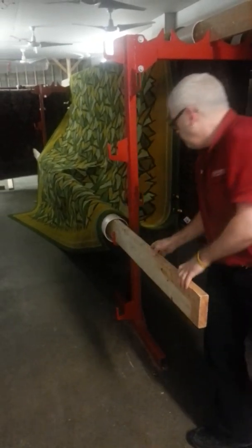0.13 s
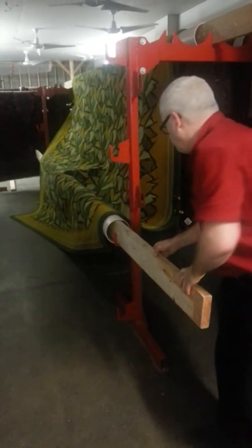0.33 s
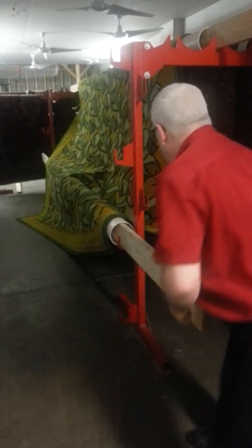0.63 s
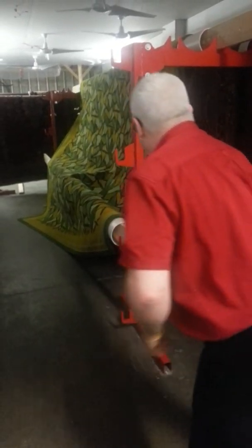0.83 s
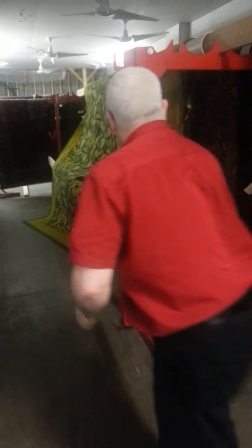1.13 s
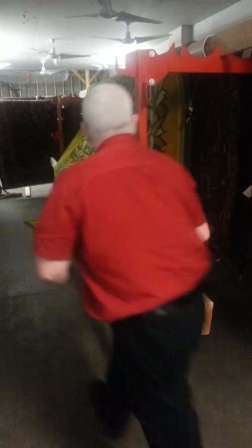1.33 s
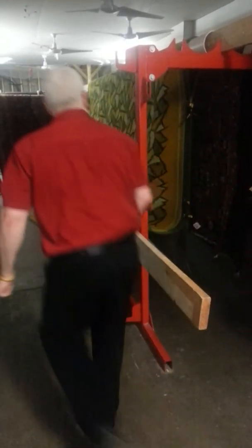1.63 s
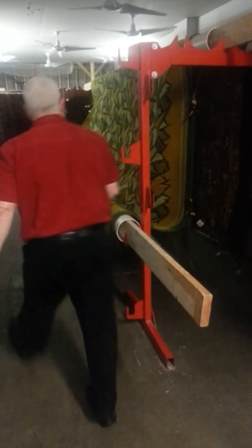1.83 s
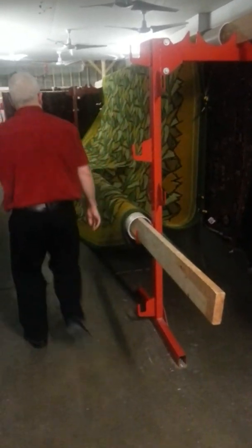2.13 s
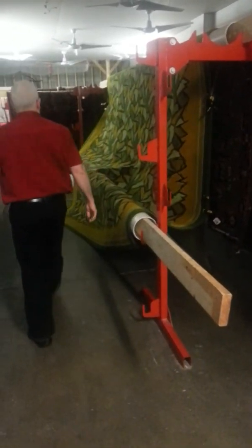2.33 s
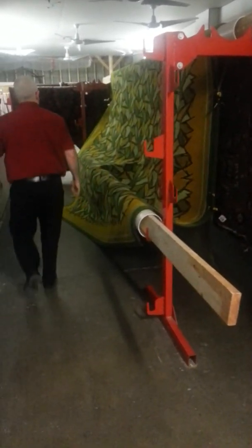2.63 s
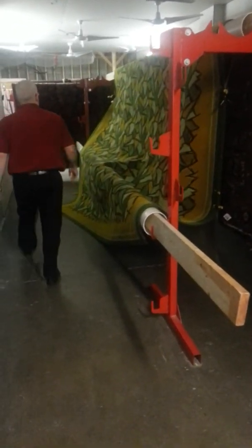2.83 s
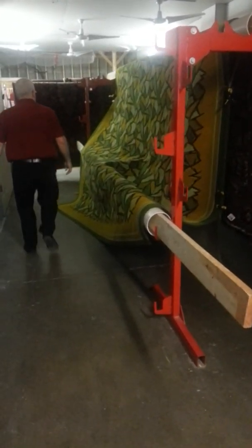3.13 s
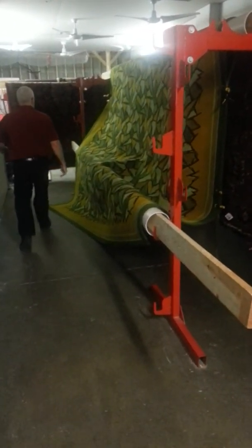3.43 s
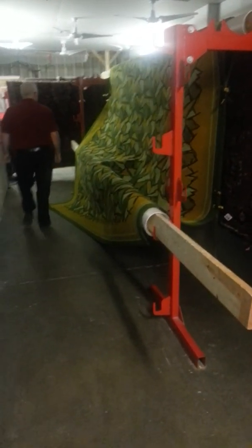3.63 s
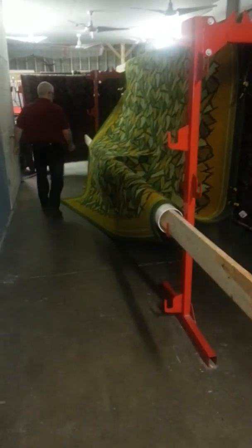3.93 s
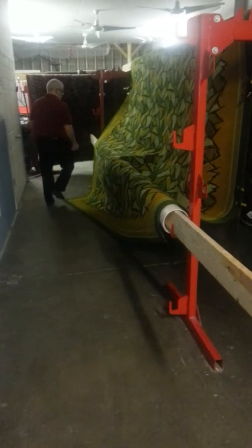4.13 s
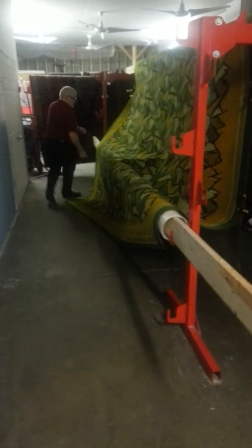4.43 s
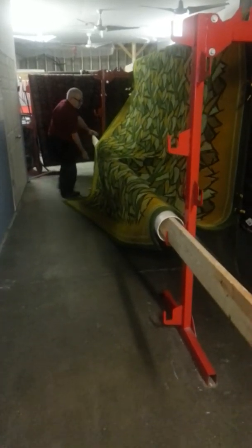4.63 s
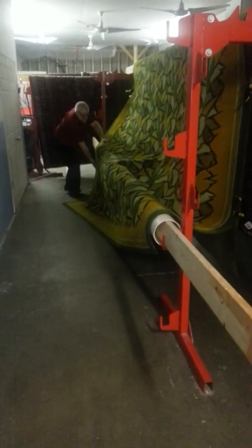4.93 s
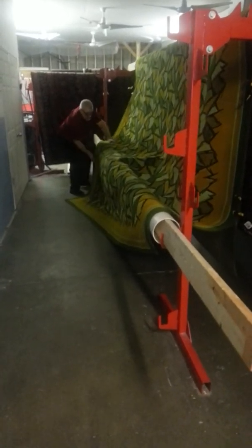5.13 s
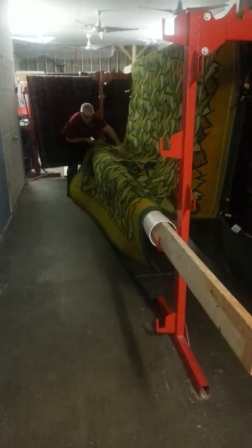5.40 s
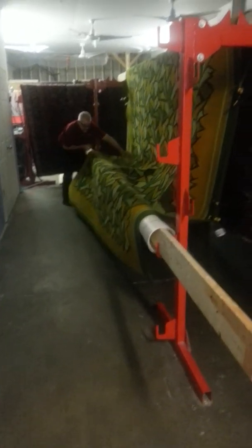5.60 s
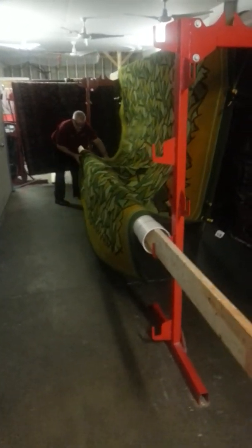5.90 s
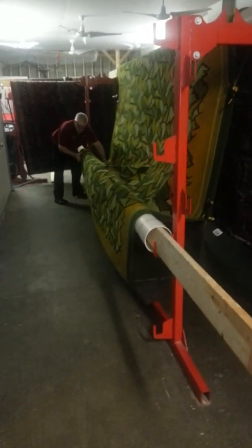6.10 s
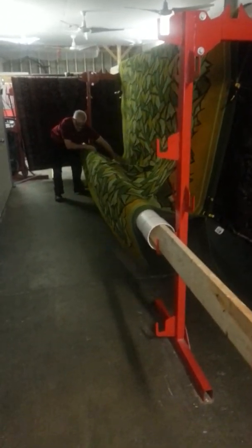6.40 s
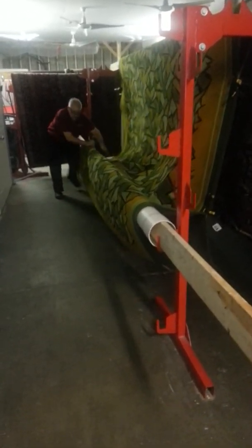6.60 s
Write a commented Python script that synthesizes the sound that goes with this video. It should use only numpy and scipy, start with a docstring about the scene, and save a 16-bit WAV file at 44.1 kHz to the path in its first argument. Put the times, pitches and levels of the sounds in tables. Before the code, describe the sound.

In a concrete workshop, a hand knocks a wooden beam, which rings briefly with a bright rub. Soft shoes then walk away, each dull heel tap wrapped in scuffing hiss, with a few slips and tiny rubber squeaks. From about five seconds a heavy wet rug is gripped and dragged in two rustling pulls, with low hollow thumps. Faint hum and engine noise surface only under the louder sounds. Handheld stereo device, noise-suppressed, with short room reflections.

```python
"""Soft shoes walk a concrete workshop floor, then a heavy wet rug is gripped and dragged over a wooden beam.
Soles, cloth and weave are shaped noise following stroke tables; heels and rug folds land as low noise and
short pushes answered by the walls. Slips are puffs of hiss, squeaks short sines, the beam a set of ringing modes.
A room drone, a machine hum and an engine outside are turned down in the pauses by a noise suppressor.
A faint hiss lies beneath; in all the noise layers the two microphone ports are alike mainly in the bass."""
import sys
import numpy as np
from scipy import signal
from scipy.fft import rfft, irfft, next_fast_len
from scipy.io import wavfile
from scipy.ndimage import uniform_filter1d, map_coordinates

SR = 44100
rng = np.random.default_rng(int(sys.argv[2]) if len(sys.argv) > 2 else 0)


def materialize(psi):
    """Save the field psi as 16-bit PCM at rate SR to the path in sys.argv[1].

    A 1-D psi becomes a single channel; in a 2-D psi each row is a channel.
    """
    bounded = np.clip(np.atleast_2d(psi).T, -1, 1)
    quanta = np.round(bounded * 32767).astype(np.int16)
    wavfile.write(sys.argv[1], SR, quanta)


N = 297965
TIME = np.arange(N) / SR  # seconds


def amp(db):
    """dB to gain."""
    return 10 ** (np.asarray(db) / 20)


def unit(x):
    """Scaled to rms 1."""
    return x / np.sqrt(np.mean(x ** 2) + 1e-20)


def along(points, hz):
    """Read (Hz, value) points at any frequency, on a log axis."""
    f, v = np.transpose(points)
    return np.interp(np.log(hz + 1), np.log(f + 1), v)


def curves(rows):
    """One value per sample for each column after the time."""
    s, *cols = np.transpose(rows)
    return [np.interp(TIME, s, c) for c in cols]


def wobble(rate):
    """A smooth random curve, rate knots a second."""
    knots = rng.standard_normal(int(N * rate / SR) + 4)
    return map_coordinates(knots, [np.arange(N) * rate / SR])


def filtered(x, response):
    """x times a response of frequency, padded so that its end does not wrap round."""
    m = next_fast_len(N + SR // 2)
    return irfft(rfft(x, m) * response(np.fft.rfftfreq(m, 1 / SR)), m)[..., :N]


def sides(pan_db):
    """Left and right gains for a left-right level difference."""
    return amp(np.array([pan_db / 2, -pan_db / 2]))


def fade_over(start_s, length_s):
    """Angle from 0 to a quarter turn, for an equal-power crossfade."""
    return np.pi / 2 * np.clip((TIME - start_s) / length_s, 0, 1)


# How alike the ports hear noise. Each row: frequency in Hz, left-right likeness from 0 to 1.
LIKENESS = [(60, .99), (180, .985), (300, .85), (450, .5), (800, .1), (1500, 0)]


def rush(spectrum, patchy_db, grainy_db, ripple_db=3.0):
    """Stereo noise, middle at rms 1: broad random patches, narrow slowly changing spectral ripples, fine grains."""
    z = signal.stft(rng.standard_normal((2, N)), nperseg=1024)[2]
    patches = rng.standard_normal(z.shape[1:])
    patches = uniform_filter1d(uniform_filter1d(patches, size=16, axis=0), size=3, axis=1)
    ripples = uniform_filter1d(rng.standard_normal(z.shape[1:]), size=10, axis=1)
    gain = amp(patchy_db * unit(patches) + ripple_db * unit(ripples))
    pair = signal.istft(z * gain, nperseg=1024)[1][:, :N]

    def mid_side(hz):
        turn = np.arccos(np.clip(along(LIKENESS, hz), 0, 1)) / 2
        return amp(along(spectrum, hz)) * [np.cos(turn), np.sin(turn)]

    mid, side = filtered(pair * amp(grainy_db * wobble(400)), mid_side)
    return np.array([mid + side, mid - side]) / np.sqrt(np.mean(mid ** 2))


def crackle(rate, size_db):
    """Sub-millisecond gain spikes at random moments, like fibres tearing loose, few of them large."""
    draws = rng.random((int(rate * N / SR), 2))
    sizes = amp(-size_db * np.log(draws[:, 1] + 1e-3)) - 1
    spikes = np.bincount((draws[:, 0] * N).astype(int), sizes, N)
    return 1 + signal.fftconvolve(spikes, np.exp(-np.arange(200) / SR / 0.00024))[:N]


RISE_CURVE = 1.51  # a stroke's amplitude grows as this power of time


def strokes(rows):
    """Each stroke rises, holds and dies away; the summed power of all, then of each share column."""
    t = np.arange(0, N / SR + .002, .001)
    s, rise, hold, t60, db, *shares = np.array(rows).T[..., None]
    rise, t60 = rise + .002, t60 + .02  # keeps the shortest strokes from clicking
    growth = np.clip((t - s) / rise + 1, 0, 1) ** RISE_CURVE
    gain = growth * amp(db - 60 * np.clip(t - s - hold, 0, None) / t60)
    powers = [((gain * amp(share)) ** 2).sum(axis=0) for share in [0, *shares]]
    return [np.interp(TIME, t, power) for power in powers]


# Scuffs of sole, trouser or hand. Each row: full at in seconds, rise in seconds (2 ms is added), hold in
# seconds, t60 in seconds (20 ms is added), level in dB, coarse weave share in dB.
SCUFF_STROKES = [(0.0, .02, 0.032, .2, -66, -10), (0.05, .018, .01, .1, -49.5, -3),
                 (0.074, 0.025, .01, 0.52, -41, -7), (0.25, 0.078, .005, 0.43, -53.5, -7),
                 (0.39, 0.022, .002, .17, -54.5, -10), (0.556, 0.0073, 0.0082, .1, -61, -16),
                 (0.574, 0.028, .07, 0.18, -52, -10), (0.795, 0.18, .005, .1, -67.5, -1.5),
                 (0.813, 0.016, 0.017, 0.18, -47.5, -4), (0.86, 0.045, 0.079, 0.16, -51.5, -10.5),
                 (1.047, 0.035, .002, .12, -68, -7), (1.33, 0.073, .08, .3, -63.5, -7.5),
                 (1.426, 0.071, .005, 0.95, -55, -5.5), (1.53, 0.015, .003, 0.63, -52.5, -1.5),
                 (1.618, 0.088, 0.024, 0.36, -50.5, -9), (1.854, 0.59, .005, 0.27, -76, -7),
                 (2.04, .09, .005, .2, -56, -5), (2.054, 0.011, 0.016, .3, -53, 2.5),
                 (2.108, 0.1, 0.0046, 0.49, -46, -8.5), (2.26, 0.01, 0.0027, 0.23, -47, -11),
                 (2.45, .6, .04, .3, -70, -3), (2.536, 0.052, 0.042, .2, -57.5, 0),
                 (2.61, 0.045, 0.045, 0.22, -48, -4.5), (2.84, 0.049, .045, .2, -63, -8),
                 (2.899, 0.013, 0.0043, 0.21, -55, -10.5), (2.986, 0.083, .005, 0.64, -68.5, 0),
                 (3.06, 0.022, .01, .3, -66, 5), (3.112, 0.091, .005, 0.31, -48, -6),
                 (3.244, 0.0079, 0.014, 0.21, -52, -14.5), (3.46, .04, .03, .2, -72, -8),
                 (3.504, 0.015, 0.09, 0.28, -50, -7), (3.618, 0.1, .003, 0.18, -46, -3),
                 (3.67, .05, .005, 1, -60, -5.5), (3.814, 0.036, .005, .43, -52.5, -10.5),
                 (4.008, 0.0088, .012, .1, -55.5, -5.5), (4.021, 0.0035, 0.039, 0.58, -49, -3.5),
                 (4.166, 0.047, 0.038, 0.24, -45.5, -7), (4.457, 0.011, .012, .1, -59, 1),
                 (4.481, 0.021, 0.069, 0.36, -48, -2), (4.579, 0.025, .003, .38, -46, -5.5),
                 (4.68, 0.034, .03, .2, -66, 2.5), (4.72, .007, 0.049, .5, -53, -8),
                 (4.794, 0.0069, 0.038, 0.25, -45.5, -6.5), (4.856, 0.085, 0.0039, 0.57, -40.5, -4.5),
                 (5.03, 0.074, 0.019, 0.22, -46, -3.5)]
# Colours of soles and trousers, wet pile, dry sizzle and coarse weave.
# Each row: frequency in Hz, relative density in dB per Hz.
SHOE_COLOUR = [(1470, -28), (2500, -17), (3180, -6.5), (3510, -7), (4390, -1.5), (6210, 0.5), (7070, 2.5),
               (8120, -4.5), (9500, -11), (12400, -20), (20900, -120)]
WET_COLOUR = [(1470, -36), (2500, -7), (2780, -9), (3180, -4), (6040, 1), (6640, 3), (9500, -11),
              (12400, -21), (20900, -120)]
SIZZLE_COLOUR = [(5590, -43), (9500, -3), (13900, -3), (14500, -23), (14900, -10)]
WEAVE_COLOUR = [(410, -3.5), (700, -0.5), (764, -6.5), (1020, 0.5), (2290, -2), (2800, -6.5), (3500, -6),
                (4550, -13), (7700, -120)]
# Where the rubbing stands. Each row: time in seconds, left-right difference in dB.
RUB_PLACE = [(0.0, 0.5), (0.66, -1.5), (1.5, -.3), (2.8, -0.1), (3.8, 0), (4.68, -1.8), (5.81, -1.5),
             (6.76, -1)]
GRIP_AT, GRIP_FADE = 4.27, 0.33  # the rug takes over from the shoes, s
SIZZLE_DB, SIZZLE_SLOPE = -11.5, -0.21  # share at a -52.5 dB stroke; change for each dB louder
SIZZLE_SMOOTH = -0.25  # dB for each dB of weave share: smooth strokes sizzle more
SIZZLE_WET_DB = -1.5  # change of sizzle on the wet rug


def rubbing():
    """Fine fibres hiss, dry grit sizzles above, the coarse weave rasps lower; all stutter together."""
    scuff, weave = strokes(SCUFF_STROKES)
    rustle, _, _, rug_weave = dragging()
    level = np.sqrt(scuff + rustle + 1e-12)
    turn = fade_over(GRIP_AT, GRIP_FADE)
    weave_db = 10 * np.log10((weave + rug_weave + 1e-13) / level ** 2)
    sizzle_db = SIZZLE_DB + SIZZLE_SLOPE * (20 * np.log10(level) + 52.5)
    sizzle_db = sizzle_db + SIZZLE_SMOOTH * weave_db + SIZZLE_WET_DB * np.sin(turn)
    shoes = np.cos(turn) * rush(SHOE_COLOUR, patchy_db=2.0, grainy_db=0.55)
    wet_pile = np.sin(turn) * rush(WET_COLOUR, patchy_db=0.65, grainy_db=0.5)
    sizzle = amp(np.clip(sizzle_db, -30, 0)) * rush(SIZZLE_COLOUR, patchy_db=1.4, grainy_db=1.0)
    weave_level = np.sqrt(weave + rug_weave) * amp(0.14 * wobble(45))
    coarse = weave_level * rush(WEAVE_COLOUR, patchy_db=2.05, grainy_db=-1.0)
    stutter = amp(0.55 * wobble(30)) * crackle(rate=95, size_db=1.5)
    return stutter * sides(curves(RUB_PLACE)[0]) * (level * (shoes + wet_pile + sizzle) + coarse)


# Weight landing, a foot on the floor or a fold of rug. Each row: full at in seconds, rise in seconds (2 ms is
# added), hold in seconds, t60 in seconds (20 ms is added), body in dB, hard edge share in dB, boom share in dB.
LANDING_STROKES = [(0.0, .02, .02, .3, -68.5, -10, 7), (0.051, 0.0059, 0.12, 0.89, -51.5, 1.5, -9),
                   (0.411, 0.27, .005, 0.28, -69, -13, 2), (0.57, 0.03, 0.097, .5, -66, -3, -4.8),
                   (0.722, .06, 0.038, 0.43, -66.5, -6, -3), (0.822, 0.015, 0.022, .18, -50, -11, -9),
                   (0.9, 0.062, .005, 0.47, -65.5, 2, -6), (1.32, 0.033, .02, .3, -68.5, -3, 7),
                   (1.444, 0.14, .005, 0.25, -62.5, -5, -6), (1.532, .004, 0.03, 0.4, -47.5, -3.5, -5),
                   (1.702, .2, 0.0017, 0.44, -62, -10, 0), (2.035, 0.33, 0.0045, .2, -68, -6, -1),
                   (2.073, 0.032, 0.057, 0.25, -45.5, -4.5, -6.5), (2.277, 0.14, .005, 0.66, -62.5, -10, 0),
                   (2.45, .6, .04, .3, -67, -3.5, -5), (2.514, 0.017, 0.019, .1, -52, -15, -5),
                   (2.553, .004, .015, 0.5, -43, -3.5, -7), (2.878, 0.12, .005, 0.36, -68.5, -7, -2),
                   (2.983, .004, 0.02, 0.3, -59, -4, 0), (3.059, .005, 0.062, 0.22, -44, -7, -4.5),
                   (3.294, 0.25, .005, 0.5, -69.5, -1, 1.5), (3.46, .08, .02, .2, -71.5, -6, 7),
                   (3.51, .03, .005, .2, -63, -17, 5), (3.529, 0.0044, 0.09, 0.26, -45, -5.5, -7),
                   (3.78, .12, .005, 1.5, -65.5, -10, -7), (4.006, .012, .012, .1, -57, -7, 4),
                   (4.021, .004, 0.064, .55, -47.5, -1.5, -4), (4.33, 0.093, 0.07, .5, -73, -2, 4),
                   (4.456, 0.013, 0.011, .1, -55.5, -8, 3), (4.468, .004, 0.083, 0.32, -45.5, -3, -7),
                   (4.796, .004, .03, .25, -48.5, -8, -8), (4.875, 0.038, 0.029, 0.33, -45.5, -0.5, -14),
                   (5.048, 0.048, .01, 0.23, -54.5, -6, 3), (5.642, 0.061, .005, 0.38, -39.5, -3.5, -9),
                   (5.694, .04, 0.019, 0.37, -45.5, 0.5, 4), (5.94, .02, 0.0046, .15, -60, -7, 11),
                   (6.006, 0.028, 0.021, 0.33, -47.5, -7.5, 10.5), (6.122, 0.0036, 0.0054, 0.7, -42, -9, 1),
                   (6.512, .04, .055, 0.27, -46.5, -5.5, 4.5)]
# Colours of the dull body and the hard edge of sole or beam.
# Each row: frequency in Hz, relative density in dB per Hz.
BODY_COLOUR = [(110, -21), (180, -4), (280, -0.5), (346, 1.5), (480, -6.5), (620, -51), (1060, -120)]
EDGE_COLOUR = [(280, -25), (480, 1), (736, -2), (863, -3), (954, -6.5), (1100, -8), (1430, -27),
               (2420, -120)]
DRAG_EDGE_DB = -3.5  # hard edge share of the dragged rug


def weight():
    """Landing weight and the dragged rug stir a dull body and a harder, crackling edge, both in lumps."""
    body, hard, _ = strokes(LANDING_STROKES)
    rug = dragging()[1]
    dull = np.sqrt(body + rug) * rush(BODY_COLOUR, patchy_db=1.15, grainy_db=1.05, ripple_db=2.4)
    edge_level = np.sqrt(hard + rug * amp(DRAG_EDGE_DB) ** 2)
    edge = edge_level * rush(EDGE_COLOUR, patchy_db=0.7, grainy_db=0.8, ripple_db=3.0)
    return amp(0.68 * wobble(40)) * (dull + crackle(rate=60, size_db=3.0) * edge)


OPEN_DB, OPEN_SLOPE, SHUT_DB = -46, 0.54, -20  # low-band level that opens fully, dB per dB, deepest cut
OPEN_S, OPEN_HZ = .02, 700  # averaging time; it listens below this, where the background lies


def suppressor(near):
    """Gain left to the steady background: full under loud near sounds, cut in the pauses."""
    low = filtered(near, lambda hz: hz < OPEN_HZ)
    power = uniform_filter1d(np.mean(low ** 2, axis=0), size=round(OPEN_S * SR))
    level_db = 10 * np.log10(np.abs(power) + 1e-12)
    return amp(np.clip(OPEN_SLOPE * (level_db - OPEN_DB), SHUT_DB, 0))


# Colours of the room, and of the pipe that the rug rolls round the beam.
# Each row: frequency in Hz, relative density in dB per Hz.
ROOM_COLOUR = [(13, -44), (22, -14), (48, 4.5), (86, 0.5), (220, -4.5), (290, -31), (480, -120)]
PIPE_COLOUR = [(24, -43), (40, -7), (59, -12), (86, -10), (126, 0), (139, 0), (183, -12.5), (220, -9),
               (290, -34), (480, -120)]
DRONE_DB = -62  # with the suppressor open
PIPE_FROM, PIPE_FADE = 5.6, 0.24  # s


def drone(opening):
    """Suppressed room drone plus the boom of landings and drag; late on the hollow pipe colours it."""
    boom = strokes(LANDING_STROKES)[2] + dragging()[2]
    power = boom + (amp(DRONE_DB) * opening) ** 2
    turn = fade_over(PIPE_FROM, PIPE_FADE)
    room = rush(ROOM_COLOUR, patchy_db=2.4, grainy_db=1.0, ripple_db=1.4)
    pipe = rush(PIPE_COLOUR, patchy_db=3.5, grainy_db=-1.5, ripple_db=0.5)
    return np.sqrt(power) * amp(0.49 * wobble(18)) * (np.cos(turn) * room + np.sin(turn) * pipe)


def tone(rows, orders):
    """A slightly unsteady tone with its partials, silent outside its table."""
    hz, db = curves(rows)
    on = np.clip(np.minimum(TIME - rows[0][0], rows[-1][0] - TIME) / 0.049, 0, 1)
    turns = 2 * np.pi * np.cumsum(hz) / SR + .3 * wobble(10)
    partials = sum(amp(level + 0.93 * wobble(5.6)) * np.sin(k * turns) for k, level in orders)
    return np.sqrt(2) * on * amp(db) * partials


# A machine tone. Each row: time in seconds, pitch in Hz, level in dB with the suppressor open.
HUM_PITCH = [(0.0, 158, -59.5), (1.5, 158.8, -59.5), (3.1, 160.9, -60)]
# Two machines side by side. Each row: multiple of the pitch, relative level in dB.
HUM_MACHINES = [(1, 0), (.745, -5)]


def hum():
    """Two machines turn at nearly steady speeds, each giving one sine."""
    return tone(HUM_PITCH, HUM_MACHINES)


# Microphone and air. Each row: frequency in Hz, relative density in dB per Hz.
HISS_COLOUR = [(120, -7), (200, 1.5), (669, -9), (960, -9.5), (1010, -23), (1300, -8), (2120, -14.5),
               (5220, -13.5), (12000, -18.5), (14100, -18), (14900, -24)]


def hiss():
    """Faint noise of microphone and air at a constant mean level."""
    return amp(-70.5) * rush(HISS_COLOUR, patchy_db=-2.0, grainy_db=-1.0)


# How long the walls answer. Each row: frequency in Hz, t60 in seconds.
WALL_DECAY = [(100, 0.4), (400, 0.15), (1500, 0.33), (8000, 0.34)]


def walls(pulse):
    """A fresh stereo answer of the room, each frequency dying at its own speed."""
    a, b = rng.standard_normal((2, SR // 3))
    noise = np.array([a + 0.74 * b, a - 0.57 * b])  # the ports hear partly the same echoes
    hz, t, z = signal.stft(noise, SR, nperseg=512)
    decay = amp(-60 * t / along(WALL_DECAY, hz)[:, None])
    tail = signal.istft(z * decay, SR, nperseg=512)[1]
    tail = tail * (1 - np.exp(-np.arange(tail.shape[1]) / SR / 0.0021))  # echoes gather over the first ms
    return signal.fftconvolve(pulse[None], tail / np.linalg.norm(tail[0]), axes=1)


# Heel, toe and rug blows. Each row: start in seconds, push level in dB, pitch in Hz, room answer in dB.
BLOWS = [(0.0492, -28.5, 900, -3), (0.0656, -39, 1010, -4), (0.8215, -36, 357, -1),
         (1.531, -31.5, 566, -17), (2.0518, -43, 830, 3), (2.063, -46, 400, 4), (2.1291, -40, 300, -5),
         (2.5149, -42, 402, 0), (2.5512, -38, 400, 8.5), (2.982, -48, 308, 0), (3.056, -43, 430, 4),
         (3.5284, -33.5, 620, 0), (3.592, -27.5, 1350, -2), (4.019, -33, 524, -5), (4.4675, -38, 503, -11),
         (4.481, -29.5, 960, 5), (4.7957, -36, 298, 3), (4.875, -35, 250, -13), (5.637, -29.5, 306, -2),
         (6.009, -35, 153, -2), (6.035, -42, 135, -11), (6.121, -28, 265, -1), (6.136, -39, 257, 9),
         (6.512, -26.5, 144, -9), (6.549, -31.5, 155, -11)]


def knocks():
    """A soft blow is a push of under two cycles, a little later in the right port; then the walls answer."""
    out, t = np.zeros((2, N + SR)), np.arange(SR // 20) / SR
    for s, db, hz, room_db in BLOWS:
        turns = hz * (t - np.array([[0], [.0002]]))
        swell = np.sin(np.pi * np.clip(turns / 1.64, 0, 1)) ** 0.94
        push = -amp(db) * np.sin(2 * np.pi * turns) * swell
        answer = amp(room_db) * walls(push[0])
        start = round(s * SR)
        out[:, start:start + len(t)] += push
        out[:, start:start + answer.shape[1]] += answer
    return out[:, :N]


# Modes of the wooden beam. Each row: pitch in Hz, relative level in dB, t60 in seconds.
BEAM_MODES = [(391, -3, 0.57), (506, -9, 1.5), (686, -11, 0.68), (825, -3, .9), (1030, -2, .8),
              (1290, -4.5, 1.7), (1405, -3, 0.69), (1630, -4, 1)]


def beam():
    """The beam rings after the first blow, modes fluttering, own phase in each port; faded out 0.3 s later."""
    t = np.clip(TIME - BLOWS[0][0], 0, None)
    ring = 0
    for hz, db, t60 in BEAM_MODES:
        flutter = amp(db - 60 * t / t60 + 3.3 * wobble(33))
        ring = ring + flutter * np.sin(2 * np.pi * hz * t + rng.uniform(0, 5.4, (2, 1)))
    fade_out = np.clip((.3 - t) / 0.048, 0, 1)
    return amp(-51) * (1 - np.exp(-t / 0.006)) * fade_out * ring


# Sudden slips of a sole or a wet fold. Each row: start in seconds, level in dB (the puff's rms starts 6 dB
# lower), centre in Hz, t60 in seconds, half-width in octaves.
SLIP_PUFFS = [(0.07, -28, 4530, 0.2, 0.37), (0.3886, -38, 5100, 0.043, 0.52),
              (0.8091, -47, 6430, 0.057, 0.6), (1.5305, -40, 5170, 0.07, 0.32),
              (1.6207, -32, 5900, 0.036, 0.5), (2.0507, -34.5, 5240, 0.05, 0.3),
              (2.8465, -45, 5730, 0.07, 0.73), (2.8933, -40, 6070, 0.07, 0.48),
              (3.243, -52, 5130, 0.07, 0.65), (3.5024, -50, 6720, 0.07, 0.55),
              (3.7908, -42, 6150, 0.056, 0.48), (3.809, -37.5, 6300, 0.11, 0.47),
              (4.02, -31, 4630, 0.074, 0.22), (4.718, -41, 5450, 0.07, 1), (4.793, -34, 5780, 0.055, 0.84),
              (4.8447, -26, 3890, 0.12, 0.53), (5.3512, -40, 6440, 0.07, 0.55)]
# Rubber chirps. Each row: start in seconds, level in dB before rise and decay, pitch in Hz.
RUBBER_SQUEAKS = [(3.62, -34.5, 3600), (4.581, -33.5, 3380), (4.582, -33, 3930), (4.6, -40, 1920),
                  (4.618, -38, 6650), (2.455, -64, 2000)]


def slips():
    """A slip is a puff of hiss around its centre with a fast rise; a squeak is a few ms of one pitch."""
    out, t = np.zeros((2, N + SR)), np.arange(SR // 4) / SR
    f = np.fft.rfftfreq(len(t), 1 / SR)
    for s, db, hz, t60, octaves in SLIP_PUFFS:
        colour = 1 / (1 + (np.log2((f + 1) / hz) / octaves) ** 2)
        puff = unit(irfft(rfft(rng.standard_normal((2, len(t)))) * colour, len(t)))
        envelope = amp(db - 60 * t / t60) * np.minimum(t / .001, 1)
        out[:, round(s * SR):][:, :len(t)] += envelope * puff / 2
    for s, db, hz in RUBBER_SQUEAKS:
        envelope = amp(db - 60 * t / 0.029) * np.minimum(t / 0.0018, 1)
        out[:, round(s * SR):][:, :len(t)] += envelope * np.sin(2 * np.pi * hz * t)
    return out[:, :N]


# An engine outside. Each row: time in seconds, pitch in Hz, level in dB with the suppressor open.
ENGINE_PITCH = [(3.7, 59, -54), (3.96, 58.5, -58), (4.07, 49.65, -50), (4.41, 53.6, -53.5),
                (4.82, 56.54, -53.5), (5.44, 60.15, -53), (5.99, 65.64, -56), (6.76, 67.2, -59)]
# Its orders. Each row: multiple of the pitch, relative level in dB.
ENGINE_PARTIALS = [(1, 0), (2, -8), (2.6, -9), (3, -11)]


def engine():
    """The engine's pitch drops briefly, then climbs as it speeds up, carrying its orders along."""
    return tone(ENGINE_PITCH, ENGINE_PARTIALS)


# The rug dragged over the beam, a list of rows for each of two pulls. Each row: time in seconds, rustle in dB,
# body in dB, boom in dB, coarse weave share in dB.
RUG_PULLS = [
    [(5.09, -49.5, -54.5, -64, -0.5), (5.208, -44.5, -54.5, -59, -10.5), (5.316, -44, -49, -60, -8),
     (5.374, -34.5, -48.5, -59, -5), (5.446, -40.5, -44, -57, -5.5), (5.55, -42, -48, -58, -6.5),
     (5.64, -44, -46, -59, -9), (5.69, -43, -49, -60, -4), (5.764, -47, -53, -60, -6),
     (5.85, -63, -59.5, -63, 0), (5.9, -63, -68, -63, -5)],
    [(5.91, -59, -61.5, -60, -6), (5.984, -61, -60.5, -60, 3), (6.01, -56, -63, -59, -1),
     (6.092, -64.5, -62, -62, 2), (6.188, -51.5, -48, -66, 1), (6.396, -41.5, -69, -64, -4.5),
     (6.496, -42, -48, -57, -3.5), (6.6, -49, -47.5, -60, 1), (6.674, -42, -51.5, -63, -8.5),
     (6.726, -52.5, -59, -61, -5), (6.757, -54, -66, -61, -11)],
]
DRAG_START_S = 0.013  # fade-in ending at the first row


def dragging():
    """Powers of rustle, body, boom and weave once the rug is on the move."""
    rustle_db, body_db, boom_db, weave_db = curves(np.concatenate(RUG_PULLS))
    on = np.clip((TIME - RUG_PULLS[0][0][0]) / DRAG_START_S + 1, 0, 1)
    return on * amp([rustle_db, body_db, boom_db, rustle_db + weave_db]) ** 2


def scene():
    """Near sounds, the background they let through the suppressor, and hiss."""
    near = rubbing() + weight() + knocks() + beam() + slips()
    opening = suppressor(near)
    machines = opening * (hum() + engine())
    return near + drone(opening) + machines + hiss()


# How the two ports differ in colour. Each row: frequency in Hz, left-right difference in dB.
PORT_COLOUR = [(30, -17.5), (90, 0), (180, 4), (350, 4), (700, 2.5), (1400, 7.5), (2800, 3.5), (5600, 2),
               (10000, -7), (14000, 2.5)]
BASS_HZ, TOP_HZ = 34, 14800  # bass roll-off corner; band limit


def record(dry):
    """The ports colour the sound differently, roll off the deepest bass and cut all above the band limit."""
    def ports(hz):
        bass = (1j * hz / (BASS_HZ + 1j * hz)) ** 3
        return sides(along(PORT_COLOUR, hz)) * bass * (hz < TOP_HZ)

    return filtered(dry, ports)


dry = scene()
out = record(dry)
materialize(out)
```